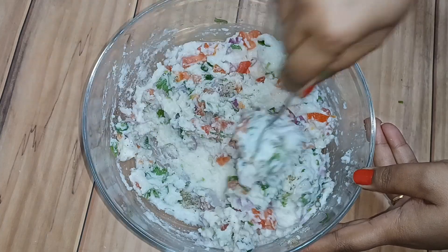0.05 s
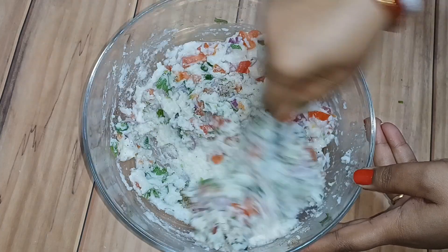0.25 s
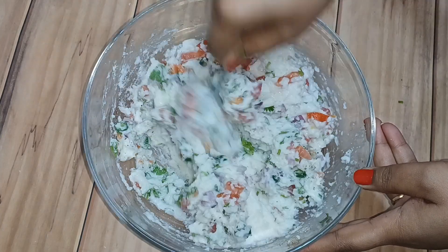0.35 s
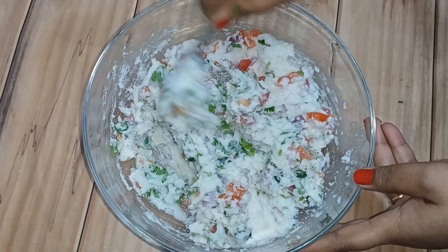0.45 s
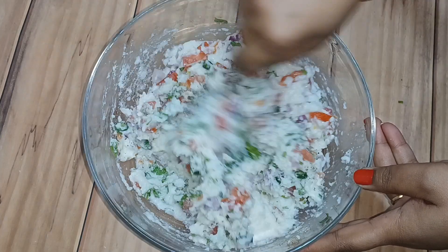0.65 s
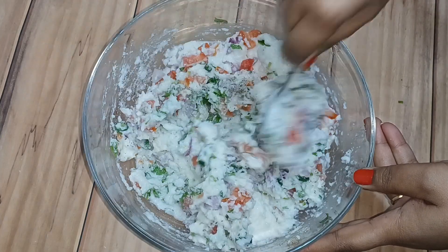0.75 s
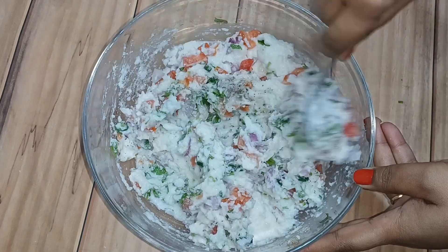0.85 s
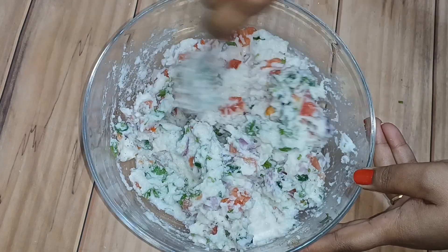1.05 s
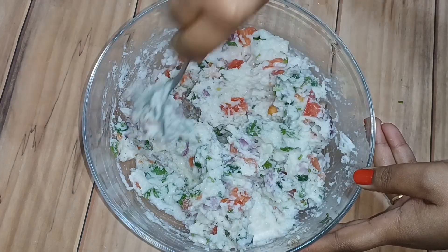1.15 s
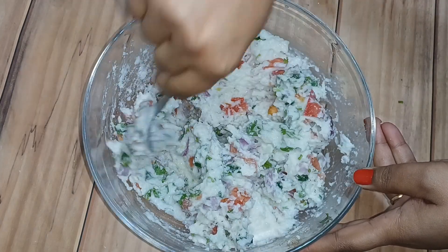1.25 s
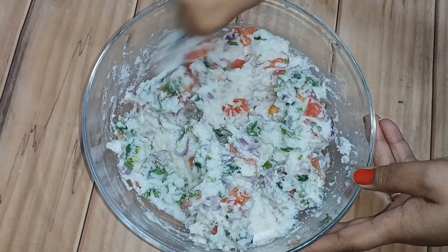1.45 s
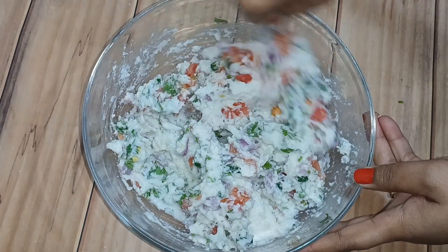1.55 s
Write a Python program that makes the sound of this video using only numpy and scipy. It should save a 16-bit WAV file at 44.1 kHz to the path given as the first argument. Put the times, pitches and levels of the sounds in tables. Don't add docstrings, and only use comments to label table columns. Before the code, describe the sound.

Sticky squelching strokes through vegetable batter in a glass bowl, a loud clink early on

```python
import sys
import numpy as np
from scipy import signal
from scipy.fft import rfft, irfft
from scipy.io import wavfile

SR = 44100
rng = np.random.default_rng(int(sys.argv[2]) if len(sys.argv) > 2 else 0)


def to_wav(s):
    ch = np.atleast_2d(s).T
    pcm = np.round(np.clip(ch, -1, 1) * 32767)
    wavfile.write(sys.argv[1], SR, pcm.astype(np.int16))


def undo_db(level):
    steps = np.asarray(level, float) / 20
    return 10 ** steps


N = 70560

# frequency in Hz, level in dB.
ROOM_TONE = [(25, -58), (80, -8.5), (140, -30.5), (260, -23), (600, -33.5), (1000, -45), (3000, -49),
             (15900, -46)]
# frequency in Hz, t60 in seconds.
KITCHEN_T60 = [(100, 0.42), (500, .35), (2000, 0.3), (5000, 0.24), (10000, 0.23), (16000, 0.42)]
# frequency in Hz, likeness from 0 to 1.
MIC_LIKENESS = [(60, 1), (150, 0.57), (400, 0.17), (2000, 0.077), (15000, .05)]
# frequency in Hz, level in dB, t60 in seconds.
TABLE_MODES = [(82.7, -1.5, 0.33), (134, 0.5, 0.22), (216, -17.5, 0.33), (246, 1.5, 0.049),
               (306, -16, 0.34), (380, -24.5, .15)]
# start in seconds, level in dB, rise in seconds, tilt in dB per octave above 80 Hz.
PUSHES = [
    (0.05, -52.5, 0.012, -6),
    (0.231, -31, 0.0021, 3.5),
    (0.358, -60, 0.01, 15),
    (0.671, -47, .03, -3),
    (.77, -37.5, 0.081, 0.5),
    (1.035, -53.5, 0.037, 7.5),
    (1.407, -40.5, 0.0027, 3),
    (1.45, -45, 0.0091, 2),
    (1.551, -43.5, 0.0032, 0.5),
    (1.584, -34, 0.013, -10),
]
# start and length in seconds, frequency in Hz, level in dB, overtones in dB.
SHUDDER = (1.078, .105, 78, -43.5, -24)
# start and length in seconds, frequency in Hz, level in dB.
SINGS = [
    (.82, .38, 1320, -65),
    (1.315, .07, 505, -63),
]
# time in seconds, effort in dB, brightness in dB per octave about 4 kHz.
STIR = [(0, -43, -4), (.13, -60.5, -6.5), (.22, -52, -1), (.43, -46.5, -3), (0.528, -80.5, -8.5),
        (.645, -57, -1.5), (0.677, -40.5, -3.5), (0.759, -38.5, -4), (0.821, -50.5, -2.5), (.85, -58.5, -6),
        (0.981, -54, -1.5), (1.02, -38.5, -0.5), (1.108, -46.5, -2.5), (1.18, -66, -7), (1.35, -74.5, -0.5),
        (1.41, -42, -2.5), (1.52, -46.5, -1.5), (1.558, -37.5, -4)]
# frequency in Hz, level in dB.
STICKY = [(200, -25.5), (600, -16), (2000, -16), (4000, -10), (6500, -9.5), (8200, -12), (11000, -8),
          (15900, -5)]
# start in seconds, peak in dB, centre in Hz, length in seconds.
POPS = [(.007, -34.5, 2770, 0.0018), (.057, -43, 2520, 0.0033), (.079, -45, 2560, 0.0016),
        (.118, -50, 2020, .002), (.354, -35, 950, 0.0057), (.349, -25, 3080, 0.0016),
        (.548, -46, 2670, 0.00044), (.664, -36.5, 2150, 0.0048), (.704, -31.5, 2010, 0.0016),
        (.713, -48, 1210, 0.0022), (.743, -28.5, 1570, 0.0015), (.7515, -46, 1436, 0.0022),
        (1.4436, -35, 3060, 0.004), (1.5505, -30.5, 2660, .0015), (1.5355, -32, 2670, 0.00061),
        (1.586, -37, 2050, 0.0013)]
# start in seconds, peak in dB, centre in Hz, length in seconds.
SMACKS = [(.0074, -30, 4870, 0.00096), (.0445, -41.5, 10600, 0.0054), (.174, -42, 12000, 0.0047),
          (.194, -45, 6800, 0.0037), (.398, -35, 6400, 0.0011), (.4214, -31.5, 10440, 0.0046),
          (.4609, -28, 6240, 0.0071), (.4685, -36.5, 6500, 0.00081), (.5482, -36.5, 5430, 0.0064),
          (.631, -39.5, 6370, 0.0078), (.6504, -39, 11100, 0.0047), (.687, -34, 8370, 0.005),
          (.9138, -40, 6300, 0.0023), (.929, -44, 9800, 0.00094), (.944, -41.5, 6200, 0.0057),
          (.9545, -52, 6000, 0.0017), (1.052, -35, 5400, 0.0016), (.9807, -41.5, 6400, 0.0029),
          (.988, -43, 8850, 0.0019), (1.0076, -39, 5200, 0.0047), (1.045, -31, 6340, 0.0016),
          (1.0856, -30, 6540, 0.0017), (1.117, -46.5, 10700, 0.00099), (1.3563, -36.5, 5560, 0.0034),
          (1.396, -47, 7000, 0.0013), (1.4035, -37, 7030, 0.0067), (1.4935, -34.5, 7100, 0.0024),
          (1.5355, -36, 4360, 0.009), (1.589, -29.5, 7140, 0.0026)]
# start in seconds, peak in dB, frequency in Hz, t60 in seconds.
CLINKS = [(.2288, -4, 3275, 0.012), (.2312, -10.5, 1870, 0.037), (.9136, -45, 2080, 0.025),
          (.9136, -47.5, 1334, 0.032), (.9136, -42, 4400, 0.014), (.9136, -41.5, 4870, 0.018),
          (.926, -47, 2060, 0.022), (.926, -54, 1380, 0.045), (.9405, -39, 2150, 0.023),
          (.947, -49.5, 2290, 0.024), (.954, -49, 2190, 0.017), (.9985, -44.5, 2080, 0.045),
          (1.0118, -37.5, 2010, 0.051), (1.012, -47, 1270, 0.037), (1.0245, -41.5, 1366, 0.1),
          (1.0267, -29.5, 2740, 0.031), (1.0267, -41.5, 1967, 0.064), (1.034, -37.5, 2110, .03),
          (1.0335, -40, 3330, 0.057), (1.404, -39.5, 1990, 0.075), (1.404, -39.5, 2730, 0.025),
          (1.4045, -41, 3330, 0.04), (1.443, -44, 2734, 0.067), (1.526, -46.5, 1470, 0.044),
          (1.5505, -34, 1364, 0.052), (1.5615, -29, 1670, 0.011), (1.5615, -35.5, 730.5, 0.073),
          (1.583, -41.5, 950, .05)]
# start in seconds, peak in dB, tilt in dB per octave away from 2 kHz, ring share 0 to 1.
TAPS = [
    (0.2284, -6.5, 0.5, 1.0),
    (.2325, -7.5, 2, 0.23),
    (1.0263, -38, 4.5, 0.25),
    (1.4041, -31, -31, 0.5),
]
BOWL_HZ = [490, 620, 778, 1244, 1925, 1992, 2852, 1392, 3767, 3845, 5030, 6312, 7250, 8500]
# level in dB, t60 in seconds.
BOWL_RING = [(-28.5, 0.21), (-21.5, 0.2), (-24.5, 0.58), (-9, 0.11), (-12, 0.24), (-13.5, 0.34),
             (-9.5, .18), (-15, .18), (-9, .15), (-1, .14), (5.5, 0.11), (-7.5, 0.2), (-14.5, 0.11),
             (-13.5, 0.07)]
SPOON_HZ = [9300, 9730, 10400, 11400, 12500, 12940, 14250, 14930]
SPOON_DB = [-13, -10, -9, -12, -12, -20, -17, -23]
# frequency in Hz, level in dB.
CRACK = [(300, -25), (1900, -17.5), (3300, -14), (5000, -14.5), (7800, -21.5), (10000, -23), (15900, -44.5)]

APART_RAD = 0.82
LEAN_DB = 1.7
SIDES = np.array([[1], [-1]])


def evened(x):
    return x / np.sqrt(np.mean(x ** 2) + 1e-20)


def read(points, hz):
    f, value = np.transpose(points)
    return np.interp(np.log(hz + 1), np.log(f + 1), value)


def add(mix, s, sound):
    part = mix[..., round(s * SR):][..., :sound.shape[-1]]
    part += sound[..., :part.shape[-1]]


def coloured(x, table):
    n = x.shape[-1]
    return irfft(rfft(x) * undo_db(read(table, np.fft.rfftfreq(n, 1 / SR))), n)


def pair():
    a, b = rfft(rng.standard_normal((2, N)))
    same = np.clip(read(MIC_LIKENESS, np.fft.rfftfreq(N, 1 / SR)), 0, 1)
    return irfft(np.array([a, same * a + np.sqrt(1 - same ** 2) * b]), N)


def resonate(x, hz, width):
    turn = np.exp(2j * np.pi * hz * np.arange(x.shape[-1]) / SR)
    r = np.exp(-np.pi * width / SR)
    return 2 * (turn * signal.lfilter([1 - r], [1, -r], x / turn)).real


def stir_effort_db():
    s, effort_db, _ = np.transpose(STIR)
    return np.interp(np.arange(N) / SR, s, effort_db)


def room_tone():
    hum = sum(undo_db(db) * resonate(pair(), hz, 22) for hz, db, _ in TABLE_MODES[:2])
    mean_db = np.transpose(STIR)[1].mean()
    swell = undo_db(0.3 * (stir_effort_db() - mean_db))
    return undo_db(-63) * evened(coloured(pair(), ROOM_TONE)) + undo_db(-59) * swell * evened(hum)


def kitchen(x):
    taps = np.zeros((2, SR // 2))
    at = np.arange(100, SR // 2 - 20, 20)
    at = at + rng.integers(0, 20, (2, len(at)))
    np.put_along_axis(taps, at, rng.choice([-1., 1.], at.shape), 1)
    hz, t, z = signal.stft(taps, SR, nperseg=256)
    decay = undo_db(-60 * t / read(KITCHEN_T60, hz)[:, None])
    tail = signal.istft(z * decay, SR, nperseg=256)[1]
    return signal.fftconvolve(x, tail / np.linalg.norm(tail[0]), axes=1)[:, :N]


def table():
    out, t = np.zeros(N), np.arange(SR // 2) / SR
    for s, db, rise, tilt_db in PUSHES:
        ring = np.zeros(len(t))
        for hz, mode_db, t60 in TABLE_MODES:
            fade = undo_db(mode_db + tilt_db * np.log2(hz / 80) - 60 * t / t60)
            ring += fade * np.sin(2 * np.pi * hz * t + rng.uniform(0, 2 * np.pi))
        onset = np.sin(np.pi / 2 * np.minimum(t / max(rise, 0.001), 1)) ** 2
        add(out, s, undo_db(db) * onset * ring)
    return out * undo_db(LEAN_DB * SIDES)


def shudder():
    s, length, hz, db, over_db = SHUDDER
    out, t = np.zeros(N), np.arange(0, length, 1 / SR)
    turn = 2 * np.pi * hz * t
    overtones = sum(np.sin(k * turn + rng.uniform(0, 2 * np.pi)) for k in range(4, 8))
    tone = np.sin(turn) + undo_db(over_db) * overtones
    add(out, s, undo_db(db) * tone * np.sin(np.pi * t / length) ** 0.4)
    return out


def singing():
    out = np.zeros((2, N))
    for s, length, hz, db in SINGS:
        t = np.arange(0, length, 1 / SR)
        noise = rng.standard_normal((2, SR // 2))
        tone = resonate(resonate(noise, hz, 50), hz, 48.2)[:, -len(t):]
        add(out, s, undo_db(db) * evened(tone) * np.sqrt(np.sin(np.pi * t / length)))
    return out


def film_grains():
    happens = rng.random(N) < 2300 / SR
    size = undo_db(-np.minimum(rng.exponential(1, N), 4)) * happens
    kind, t, grains = rng.integers(0, 30, N), np.arange(200) / SR, np.zeros((2, N))
    for k, hz in enumerate(np.geomspace(700, 14000, 30)):
        shape = np.sin(2 * np.pi * hz * t * (1 + 120 * t)) * np.exp(-t * hz / 3) * hz ** 0.87
        one = signal.oaconvolve(size * (kind == k), shape)[:N]
        grains += np.array([one, np.roll(one, int(rng.integers(-8, 9)))])
    return grains


def batter():
    s, _, bright_db = np.transpose(STIR)
    raw = evened(coloured(undo_db(-1) * evened(film_grains()) + undo_db(-3.5) * pair(), STICKY))
    hz, at, z = signal.stft(raw, SR, nperseg=256)
    octaves = np.log2((hz[:, None] + 100) / 4000)
    z = z * undo_db(np.interp(at, s, bright_db) * octaves)
    return signal.istft(z, SR, nperseg=256)[1][:, :N] * undo_db(stir_effort_db())


def bursts(rows, q, spray_db):
    out, t = np.zeros((2, N)), np.arange(1300) / SR
    for s, db, hz, length in rows:
        shared, left, right = rng.standard_normal((3, len(t)))
        fade = np.minimum(t / 0.00017, 1) * np.exp(-t / max(length, 0.0004))
        puff = (shared + 0.73 * np.array([left, right])) * fade
        rung = resonate(resonate(puff, hz, hz / q), hz, 2 * hz / q)
        spray = np.diff(puff, prepend=0) / 4
        add(out, s, undo_db(db) * (rung / abs(rung).max() + undo_db(spray_db) * spray))
    return out


def clinks():
    out, t = np.zeros((2, N)), np.arange(SR // 8) / SR
    places = rng.uniform(-1.1, 1, (len(CLINKS), 2))
    for (s, db, hz, t60), (lag, pan) in zip(CLINKS, places):
        fade = undo_db(db - 60 * t / max(t60, 0.004) + 2.5 * pan * SIDES)
        ring = np.sin(2 * np.pi * hz * t + lag * APART_RAD * SIDES) * fade
        add(out, s, ring * np.minimum(t / 0.0005, 1))
    return out


def mode_group(hz, t, phase):
    apart, split = APART_RAD * SIDES, 0.014
    middle = np.sin(2 * np.pi * hz * t + phase[0] + apart)
    below = np.sin(2 * np.pi * hz * (1 - split) * t + phase[1] + apart)
    above = np.sin(2 * np.pi * hz * (1 + split) * t + phase[2] - apart)
    return middle + undo_db(-9) * below + undo_db(-10) * above


def contact_crack(t, dull_db):
    tone = [(hz, db + dull_db * abs(np.log2(hz / 2400))) for hz, db in CRACK]
    noise = 0.9 * rng.standard_normal((2, len(t))) + rng.standard_normal(len(t))
    return evened(coloured(noise, tone)) * undo_db(6 - 60 * t / 0.02)


def glass():
    out, t = np.zeros((2, 2, N)), np.arange(SR // 3) / SR
    rows = [(hz, db, t60) for hz, (db, t60) in zip(BOWL_HZ, BOWL_RING)]
    rows += [(hz, db, 0.11) for hz, db in zip(SPOON_HZ, SPOON_DB)]
    phases = rng.uniform(0, 2 * np.pi, (len(rows), 3))
    for s, db, dull_db, ring in TAPS:
        modes = np.zeros((2, len(t)))
        for (hz, mode_db, t60), phase in zip(rows, phases):
            tilt_db = dull_db * abs(np.log2(hz / 2050))
            fade = undo_db(mode_db + tilt_db - 60 * t / (t60 * max(ring, 0.05)))
            modes += fade * mode_group(hz, t, phase)
        both = np.array([modes, contact_crack(t, dull_db)]) / 2
        add(out, s, undo_db(db) * np.minimum(t / 0.0017, 1) * both)
    return out


def scene():
    rings, cracks = glass()
    rings = rings + clinks()
    smacks = bursts(SMACKS, q=3.2, spray_db=-11)
    pops = bursts(POPS, q=2.5, spray_db=-26.5)
    noises = cracks + smacks + pops
    close = (rings + noises) * undo_db(LEAN_DB / 2 * SIDES)
    echo = kitchen(undo_db(-1.5) * noises + undo_db(-7.5) * rings)
    return room_tone() + echo + table() + shudder() + singing() + batter() + close


def top_cut(x):
    return signal.sosfilt(signal.butter(12, 16090, fs=SR, output="sos"), x)


def record(dry):
    bass_cut = signal.butter(2, 55, "high", fs=SR, output="sos")
    x = signal.sosfilt(bass_cut, dry)
    x = signal.oaconvolve(x, signal.firwin(255, 15700, fs=SR)[None], "same", axes=1)
    return top_cut(np.clip(x, -1, 1))


dry = scene()
out = record(dry)
to_wav(out)
```